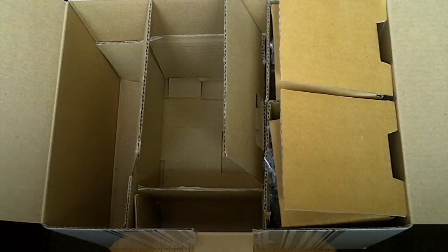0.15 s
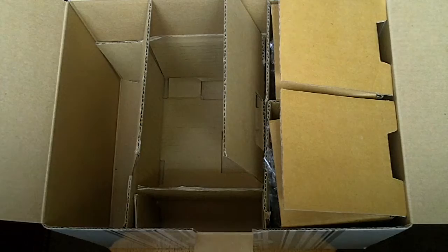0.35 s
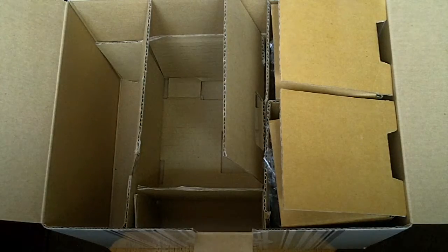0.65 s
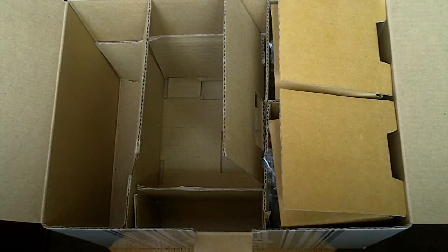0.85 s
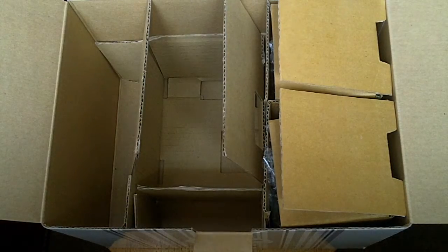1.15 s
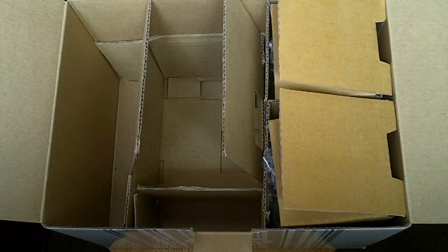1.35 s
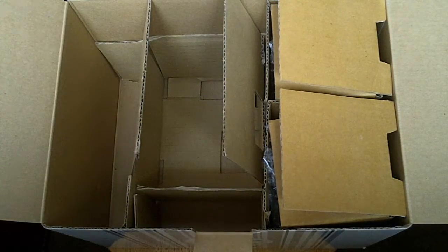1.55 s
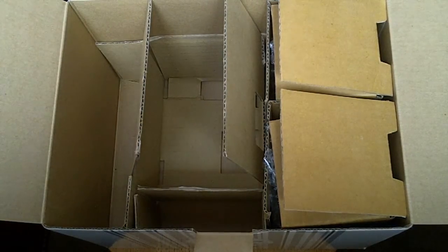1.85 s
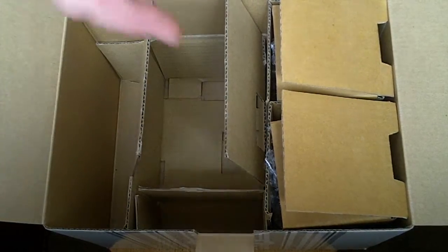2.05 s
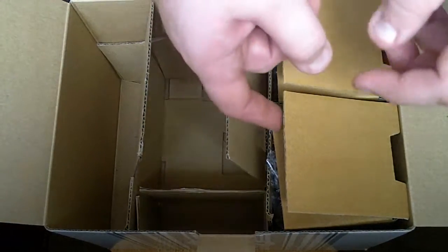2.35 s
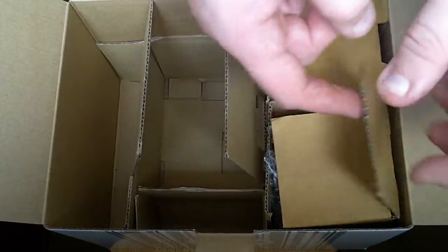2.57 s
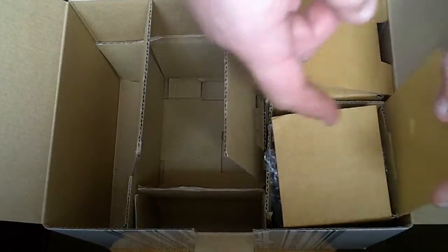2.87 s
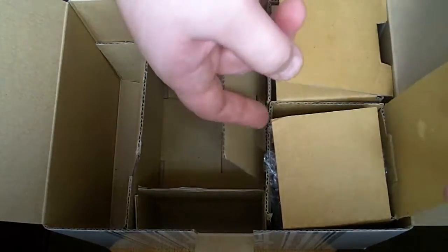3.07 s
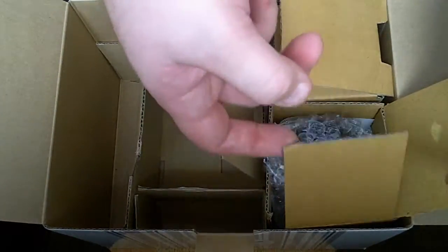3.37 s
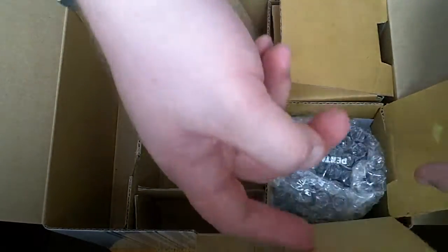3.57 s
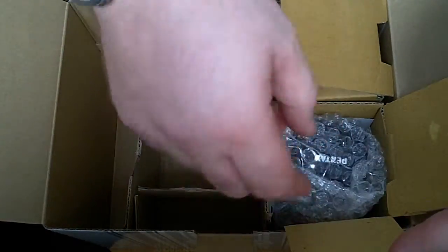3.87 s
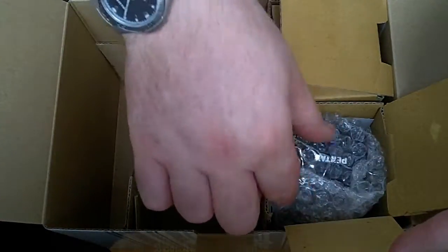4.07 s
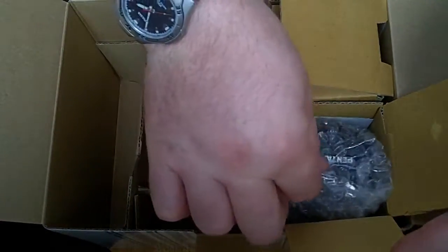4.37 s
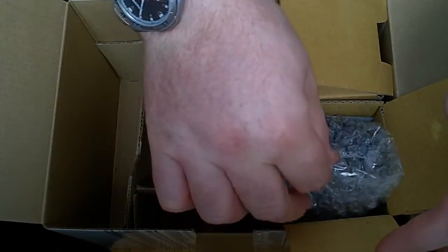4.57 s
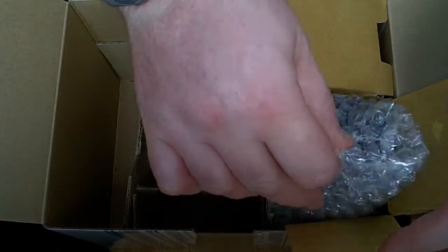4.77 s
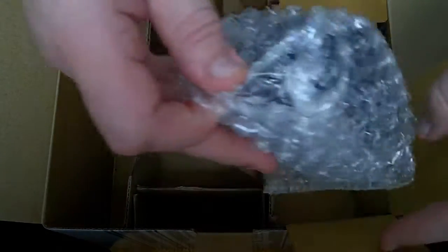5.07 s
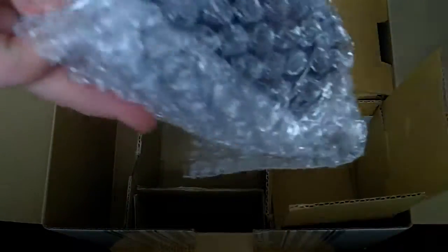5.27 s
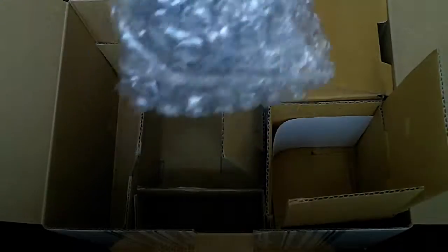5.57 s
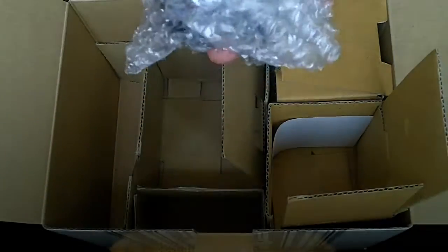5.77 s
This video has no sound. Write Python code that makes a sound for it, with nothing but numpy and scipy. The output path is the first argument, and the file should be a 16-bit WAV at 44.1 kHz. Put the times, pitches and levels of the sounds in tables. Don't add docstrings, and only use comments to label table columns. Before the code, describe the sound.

Bubble wrap crackles and snaps as a parcel is pulled from a hollow cardboard box, with bumps, a sharp flap slap and fan hum.

```python
import sys
import numpy as np
from scipy import signal
from scipy.fft import rfft, irfft, next_fast_len
from scipy.io import wavfile
from scipy.ndimage import map_coordinates

SR = 44100
rng = np.random.default_rng(int(sys.argv[2]) if len(sys.argv) > 2 else 0)


def to_linear_factor(level_db):
    exponent = np.asarray(level_db, float) / 20
    return 10 ** exponent


def waveform_to_disk(signal):
    frames = np.transpose(np.atleast_2d(signal))
    scaled = np.clip(frames, -1, 1) * 32767
    samples = np.round(scaled).astype(np.int16)
    wavfile.write(sys.argv[1], SR, samples)


N = 261072

# (frequency [Hz], level [dB per Hz])
FIZZ_SPECTRUM = [(2000, -84.5), (4000, -24.5), (5200, 5), (7300, 5.5), (10000, -2.5), (12000, -21),
                 (13500, -17.5), (15200, -16.5), (15600, -100)]


def unit(x):
    return x / np.sqrt(np.mean(x ** 2) + 1e-20)


def along(points, hz):
    f, v = np.transpose(points)
    return np.interp(np.log(hz + 1), np.log(f + 1), v)


def curves(rows):
    s, *cols = np.transpose(rows)
    return np.array([np.interp(np.arange(N) / SR, s, c) for c in cols])


def wobble(rate_hz):
    knots = rng.standard_normal(int(N * rate_hz / SR) + 4)
    return map_coordinates(knots, [np.arange(N) * rate_hz / SR])


def filtered(x, response):
    m = next_fast_len(len(x) + 8192)
    return irfft(rfft(x, m) * response(np.fft.rfftfreq(m, 1 / SR)), m)[:len(x)]


def causal(gain_db):
    cepstrum = irfft(np.log(to_linear_factor(gain_db(np.fft.rfftfreq(4096, 1 / SR))) + 1e-6))
    cepstrum = cepstrum * np.r_[1, 2 * np.ones(2047), 1, np.zeros(2047)]
    h = irfft(np.exp(rfft(cepstrum)))[:2048]
    return h / np.linalg.norm(h)


def coloured(x, spectrum):
    return signal.fftconvolve(x, causal(lambda hz: along(spectrum, hz)))[:N]


def ring(modes, t):
    return sum(to_linear_factor(db - 60 * t / t60) * np.sin(2 * np.pi * hz * t) for hz, db, t60 in modes)


def fan():
    # (frequency [Hz], level [dB per Hz])
    air_spectrum = [(15, -45), (25, -18), (70, -10.5), (177, 0.5), (382, -3.5), (520, -4), (827, -5),
                    (893, -20), (1040, -7.5), (1350, -9), (2500, -19.5), (2920, -22), (4750, -41),
                    (7750, -60), (11700, -39), (15200, -77), (22000, -120)]
    # (frequency [Hz], wander [Hz], level [dB rms])
    fan_lines = [(881, 6.55, -61.5), (1362, 8.57, -65.5), (2877, 0.92, -70)]
    noise = filtered(rng.standard_normal(N), lambda f: to_linear_factor(along(air_spectrum, f)) * (f < 11750))
    out = to_linear_factor(-52.0 + 0.65 * wobble(2.99)) * unit(noise)
    for hz, wander_hz, db in fan_lines:
        level = to_linear_factor(db) * to_linear_factor(2.5 + 1.55 * wobble(17))
        phase = 2 * np.pi * np.cumsum(hz + wander_hz * wobble(25)) / SR
        out = out + level * np.sin(phase)
    return out


def electronics():
    # (frequency [Hz], level [dB rms])
    leak_lines = [(5695, -88.5), (5755, -93), (11449, -94), (14355.6, -98), (14385.6, -95)]
    field_hz, half_line_hz, first_field_s = 59.94, 7867.1, .0146
    t = np.arange(N) / SR
    fields = (t - first_field_s) * field_hz
    flip = np.clip(12 * np.sin(np.pi * fields / 2), -1, 1)
    whine = to_linear_factor(-72) * flip * np.sin(2 * np.pi * half_line_hz * t)
    pulse = np.diff(np.floor(fields), prepend=-1)
    # (Hz, width Hz, gain)
    bands = [(5640, 240, 0.26), (6420, 300, 1), (7060, 270, 0.25), (9660, 340, 0.35), (10900, 250, 0.25)]
    tick = filtered(pulse, lambda f: sum(g * np.exp(-((f - hz) / w) ** 2) for hz, w, g in bands))
    lines = sum(to_linear_factor(db + 5.5) * np.sin(2 * np.pi * hz * t) for hz, db in leak_lines)
    return whine + to_linear_factor(-85.5) * unit(tick) + lines


def effort():
    # (time [s], film crumpling [dB], cardboard pressure [dB])
    slow_effort = [(0, -68, -53.5), (.45, -66.5, -64.5), (.74, -49.5, -55), (.83, -52.5, -48),
                   (.88, -56, -61), (1.04, -65, -66), (1.3, -71, -58.5), (2.1, -61, -58), (2.3, -58.5, -54),
                   (3.2, -61.5, -50), (3.6, -74.5, -59), (4.1, -81.5, -53), (4.37, -52.5, -45.5),
                   (5.01, -39.5, -50.5), (5.08, -60.5, -53), (5.65, -61.5, -48), (5.69, -51, -47.5),
                   (5.92, -49.5, -46)]
    # (peak time [s], rise [s], fall [s], film [dB], cardboard [dB])
    strokes = [(.206, 0.048, 0.016, -79, -53), (.97, 0.074, 0.11, -50.5, -63),
               (1.119, 0.13, 0.17, -44.5, -38), (1.448, 0.026, 0.04, -52.5, -50),
               (2.256, 0.12, 0.036, -86, -49), (2.87, 0.036, 0.13, -75, -45),
               (3.034, 0.026, 0.024, -56, -44.5), (3.114, 0.15, 0.024, -68.5, -47),
               (3.19, 0.022, .04, -56, -58), (3.34, 0.056, 0.076, -55, -51), (3.44, .04, 0.14, -55.5, -53),
               (3.77, 0.098, 0.12, -60, -65), (3.83, 0.27, 0.45, -73, -49), (4.11, 0.014, 0.084, -54, -56),
               (4.325, 0.16, 0.15, -39.5, -44.5), (4.71, 0.18, 0.075, -69, -41),
               (4.8, 0.1, 0.37, -41.5, -64), (4.939, 0.032, 0.2, -56, -40.5),
               (5.824, 0.2, 0.021, -36.5, -43), (5.901, 0.05, 0.023, -46, -40.5)]
    # (time [s], fall [s], film [dB], cardboard [dB])
    jolts = [
        (2.779, 0.074, -49, -36),
        (4.493, 0.08, -36, -32.5),
        (5.03, 0.016, -51, -23),
        (5.576, 0.014, -36.5, -53),
        (5.679, 0.065, -42, -57),
    ]
    jolt_rise_s = .001
    depth_db = 20
    t = np.arange(N) / SR
    power = to_linear_factor(2 * curves(slow_effort))
    for s, rise_s, fall_s, *db in strokes + [(s, jolt_rise_s, *rest) for s, *rest in jolts]:
        away = np.where(t < s, (s - t) / max(rise_s, 1e-3), (t - s) / max(fall_s, 1e-3))
        power = power + to_linear_factor(2 * np.array(db))[:, None] * to_linear_factor(-2 * depth_db * away)
    return 10 * np.log10(power)


def creases(per_s, spread_db, clump_db):
    hit = rng.random(N) < per_s / SR
    size = rng.standard_normal(N) * to_linear_factor(spread_db * np.minimum(rng.exponential(size=N), 3))
    return unit(hit * size * to_linear_factor(clump_db * wobble(45)))


def handling():
    # (frequency [Hz], level [dB per Hz])
    film_spectrum = [(500, -42), (1000, -5), (1700, -4.5), (2000, -1), (2900, -6.5), (4000, -9),
                     (4500, -18), (5800, -54), (9900, -120)]
    # (frequency [Hz], level [dB per Hz])
    scrape_spectrum = [(200, -92.5), (400, -37), (750, -5.5), (1000, -2), (1200, -4.5), (1480, -1),
                       (1800, -6.5), (2600, -47.5), (5000, -120)]
    # (frequency [Hz], level [dB per Hz])
    card_spectrum = [(53, -58.5), (90, -10), (230, -9.5), (270, -9), (344, -2), (580, -11), (662, -11),
                     (1000, -15.5), (1300, -42), (2200, -120)]
    # (time [s], level [dB])
    brushing = [(0, -80), (.6, -57), (.84, -46), (.95, -63), (1.3, -66.5), (2.1, -62), (2.35, -52.5),
                (2.75, -58.5), (2.95, -65), (3.6, -80.5), (4.0, -56), (4.3, -69), (5.1, -60), (5.5, -56.5),
                (5.92, -74)]
    film_db, card_db = effort()
    bright_db = -14.5 - 0.049 * (film_db + 56)
    warm_db = -3.5 + 0.45 * (card_db - film_db)
    ticks = creases(2200, spread_db=-0.5, clump_db=2.5) + .5 * rng.standard_normal(N)
    scrape = 0.38 * ticks + creases(2000, spread_db=0.5, clump_db=2.0)
    drag = creases(1500, spread_db=2.0, clump_db=3.5) + 0.97 * rng.standard_normal(N)
    film = unit(coloured(ticks, film_spectrum)) + to_linear_factor(bright_db) * unit(coloured(ticks, FIZZ_SPECTRUM))
    rub_level = np.hypot(to_linear_factor(film_db + warm_db), to_linear_factor(curves(brushing)[0]))
    rub = rub_level * unit(coloured(scrape, scrape_spectrum))
    card = to_linear_factor(card_db - 0.5) * unit(coloured(drag, card_spectrum))
    return to_linear_factor(film_db - 1.22) * film + rub + card


def snap_rows():
    # (time [s], peak [dB])
    aside = [
        (.6462, -28),
        (0.7036, -31),
        (0.7608, -28),
        (0.78, -25),
        (0.7973, -23.5),
        (.8436, -30.5),
        (0.971, -28),
    ]
    # (time [s], peak [dB], box knock [dB], fizz [dB])
    taps = [(2.2244, -30, -2, -29), (2.2524, -50, 19, -25), (2.6086, -36, -14, -31),
            (2.7768, -22, -22, -11.5), (2.7785, -24, -3, -27), (2.8687, -44, -3, -30.5),
            (3.001, -31, -14, -13.5), (3.027, -31, -2, -32), (3.0624, -28, 2, -34.5),
            (3.098, -43.5, 10, -26), (3.1212, -34.5, -15, -29), (3.1885, -31.5, -5, -13),
            (3.2168, -41, 12, -8), (3.281, -17.5, 4.5, -48), (3.315, -14.5, -9, -31),
            (3.4143, -28, -18, -28), (3.436, -29, -4, -31), (3.459, -26.5, -1, -31),
            (3.7726, -36, -14, -23.5), (3.8187, -45, 13, -21)]
    # (time [s], peak [dB], box knock [dB], fizz [dB])
    pull = [(4.1086, -36, -9, -26), (4.172, -25, -25, -26), (4.1785, -38, -34, -9),
            (4.1964, -32.5, -10, -8.5), (4.2475, -22, -25, -18), (4.256, -30, -20, -15),
            (4.2644, -22, -14, -16), (4.2944, -44, -15, -25), (4.31, -38, -15, -24), (4.328, -15, -9, -23),
            (4.3504, -22, -20, -29), (4.4352, -26, 5, -28), (4.4539, -23.5, -1, -25),
            (4.4918, -13, -2.5, -40), (4.5205, -27.5, 7, -14), (4.584, -27.5, -11, -20),
            (4.6994, -37, 2, -7), (4.791, -27, -25, -30), (4.8764, -24, -5, -17), (4.9421, -23, -16, -29),
            (4.9657, -17, -11, -18), (5.021, -12, -21, -48), (5.029, -7, -21, -19.5),
            (5.0305, -20, -0.5, -33), (5.0788, -24, -13, -21)]
    # (time [s], peak [dB], box knock [dB], fizz [dB])
    turn = [(5.115, -46, -17, -35), (5.163, -41, -15, -25), (5.2033, -28, -0.5, -22),
            (5.2474, -31, -1, -18), (5.3501, -29, -10, -36), (5.3675, -28, -1.5, -21),
            (5.418, -35.5, -18, -25), (5.466, -37, -12, -18), (5.4942, -28.5, -4, -12.5),
            (5.522, -33, -15, -13), (5.54, -33, -15, -19), (5.5592, -26.5, -18, -24),
            (5.576, -20.5, -20, -21), (5.6685, -28, -9, -15), (5.6765, -26, 14.5, -23.5),
            (5.68, -29, -7, -1.5), (5.714, -31, -24, -5), (5.7507, -20.5, -6, -16), (5.7687, -25, 5.5, -13),
            (5.782, -26, -6, -18), (5.7961, -24, -7, -14), (5.8207, -21, -19, -30), (5.8966, -38, -14, -10)]
    # (time [s], peak [dB], box knock [dB], fizz [dB])
    crackles = [(4.2338, -32, -20, -27), (4.3864, -30, -20, -29), (4.4757, -27, -20, -22),
                (4.5534, -35, -20, -22), (4.5745, -32, -20, -22), (4.6608, -41, -20, -22),
                (4.7074, -33, -20, -22), (4.7444, -31, -20, -22), (4.8014, -33, -20, -22),
                (4.8264, -31, -22, -22), (4.8394, -35.5, -20, -22), (4.9024, -33, -18, -22),
                (4.9364, -26, -20, -20), (4.9911, -30, -20, -22), (5.0594, -37, -20, -20)]
    aside_knock_db, aside_fizz_db = -13, -21
    aside = [(s, db, aside_knock_db, aside_fizz_db) for s, db in aside]
    # (t60 s, usual cell Hz)
    groups = [(aside, (0.076, 1200)), (taps, (0.031, 1760)), (pull, (0.034, 1430)),
              (turn, (0.054, 2800)), (crackles, (0.031, 2300))]
    rows = np.array([(*row, *ringing) for table, ringing in groups for row in table])
    t60_spread, cell_spread = .25, .15
    scatter = np.exp(rng.standard_normal((len(rows), 2)) * [t60_spread, cell_spread])
    return np.c_[rows[:, :4], rows[:, 4:] * scatter]


def knocked(x):
    # (frequency [Hz], width [Hz], level [dB])
    wall_modes = [(144, 28, -3.5), (232, 38, -4.5), (337, 67, 6), (464, 540, -0.5), (787, 137, 1)]

    def response(f):
        walls = 0
        for k, (hz, w, db) in enumerate(wall_modes):
            walls = walls + (-1) ** k * to_linear_factor(db) * 1j * f * w / (hz * hz - f * f + 1j * f * w)
        return walls / (1 + 1j * f / 1500) ** 2
    return filtered(x, response)


def snaps():
    # (frequency [Hz], level [dB per Hz])
    snap_spectrum = [(410, -29), (700, -3), (971, 5.5), (1410, -9.5), (1520, 2.5), (1990, 2), (3970, -8),
                     (4500, -13.5), (5850, -71.5), (9900, -120)]
    t = np.arange(SR // 8) / SR
    crack, fizz, knock = np.zeros((3, N + SR))
    for s, db, knock_db, fizz_db, t60, hz in snap_rows():
        decay = to_linear_factor(-60 * t / 0.0035) + 0.38 * to_linear_factor(-60 * t / max(t60, .005))
        burst = rng.standard_normal((2, len(t))) * decay
        burst[:, 0] = 2.8
        cell = signal.lfilter(*signal.iirpeak(hz, 2.5, SR), burst[0])
        at = slice(round(s * SR), round(s * SR) + len(t))
        crack[at] += to_linear_factor(db - 8.5) * (0.51 * burst[0] + 0.52 * cell)
        fizz[at] += to_linear_factor(db + fizz_db - 7.5) * burst[0]
        knock[at] += to_linear_factor(db + knock_db + 8.5) * burst[1]
    return coloured(crack, snap_spectrum) + coloured(fizz, FIZZ_SPECTRUM) + knocked(knock[:N])


def pings():
    # (time [s], level [dB], frequency [Hz], t60 [s])
    plucks = [
        (0.8455, -35, 1485, 0.039),
        (1.444, -32.5, 1480, 0.025),
        (2.35, -41, 1380, 0.045),
    ]
    t = np.arange(SR // 5) / SR
    out = np.zeros(N + SR)
    for s, db, hz, t60 in plucks:
        modes = [(hz, db, t60), (0.54 * hz, db - 20, t60)]
        out[round(s * SR):][:len(t)] += ring(modes, t) * (1 - np.exp(-t / 0.0011))
    return out[:N]


def box():
    # (time [s], peak [dB], contact [s])
    bumps = [
        (1.1066, -13.5, 0.0038),
        (1.121, -18, 0.0046),
        (1.1405, -11.5, 0.00059),
        (1.145, -20, 0.00073),
        (1.1502, -15.5, 0.0017),
        (1.1595, -17.5, 0.0021),
    ]
    # (frequency [Hz], level [dB], t60 [s])
    hollow_modes = [(140, -11, 0.055), (210, -0.5, 0.064), (274, 7, 0.038), (446, 6, 0.047),
                    (1164, -3.5, 0.054)]
    # (time [s], level [dB])
    slaps = [
        (3.2443, -2.5),
        (3.2454, 0),
        (3.2479, -5),
        (3.2504, -14),
        (3.28, -23),
        (3.291, -30),
    ]
    # (frequency [Hz], level [dB], t60 [s])
    flap_modes = [(133, -19, 0.17), (239.5, -6, 0.18), (347, 3, 0.0475), (704, -1.5, 0.035),
                  (806, 3.5, 0.018), (892, 4, 0.026), (1008, 4.5, 0.053), (1078, -23, 0.09),
                  (1420, -4.5, 0.027), (1920, 3, 0.022), (2060, -11, 0.087), (2300, 5, 0.015),
                  (3100, -30, 0.036), (4150, -2.5, 0.0074)]
    # (frequency [Hz], level [dB per Hz])
    crack_spectrum = [(30, -12.5), (100, -48), (600, -26), (1000, 2.5), (1400, -8.5), (1900, -7),
                      (4200, -17.5), (5500, -28.5), (9000, -38), (13000, -49.5), (16000, -68)]
    # (time [s], level [dB], frequency [Hz], t60 [s])
    belly = (1.35, -27.5, 139, 0.26)
    # (time [s], level [dB])
    flicks = [
        (2.7764, -41),
        (2.7787, -26.5),
        (2.784, -37.5),
        (2.869, -38.5),
        (3.0278, -33),
        (5.678, -35.5),
    ]
    # (frequency [Hz], level [dB], t60 [s])
    edge_modes = [(325, -15, 0.076), (493, 1.5, 0.024), (1152, -1.5, 0.035), (1693, -10, 0.045),
                  (2350, -9.5, .02)]
    t = np.arange(SR // 2) / SR
    out, cracks = np.zeros((2, N + SR))
    for s, db, contact_s in bumps:
        push = np.hanning(round(contact_s * SR) + 3)
        bump = np.convolve(ring(hollow_modes, t), push / push.sum())[:len(t)]
        out[round(s * SR):][:len(t)] += to_linear_factor(db - 10.5) * bump
    for s, db in slaps:
        out[round(s * SR):][:len(t)] += to_linear_factor(db - 12.5) * ring(flap_modes, t) * (1 - np.exp(-t / 0.00088))
        rattle = to_linear_factor(-60 * t / 0.012) + 0.11 * to_linear_factor(-60 * t / 0.1)
        cracks[round(s * SR):][:len(t)] += to_linear_factor(db - 5.5) * rattle * rng.standard_normal(len(t))
    s, db, hz, t60 = belly
    out[round(s * SR):][:len(t)] += ring([(hz, db, t60)], t) * (1 - np.exp(-t / 0.0076))
    for s, db in flicks:
        out[round(s * SR):][:len(t)] += to_linear_factor(db) * ring(edge_modes, t)
    return out[:N] + coloured(cracks, crack_spectrum)


def puffs():
    # (time [s], level [dB], length [s])
    pushes = [
        (3.2445, -29, .006),
        (1.225, -47, 0.0099),
    ]
    start_s, db, length_s = np.array(pushes).T
    u = (np.arange(N) / SR - start_s[:, None]) / length_s[:, None]
    u = np.clip(u, 0, 30)
    return to_linear_factor(db) @ (np.sin(np.pi * u) * u * np.exp(-u))


def room(x):
    # (frequency [Hz], t60 [s])
    room_t60 = [(150, 0.17), (1000, 0.23), (4000, 0.16), (12000, 0.12)]
    hz, t, z = signal.stft(rng.standard_normal(SR // 2), SR, nperseg=256)
    tail = signal.istft(z * to_linear_factor(-60 * t / along(room_t60, hz)[:, None]), SR, nperseg=256)[1]
    return signal.fftconvolve(np.pad(x, (200, 0)), tail / np.linalg.norm(tail))[:N]


def scene():
    near = handling() + snaps() + pings() + box()
    near = signal.sosfilt(signal.butter(4, 105, "high", fs=SR, output="sos"), near)
    return (near + to_linear_factor(-12) * room(near) + fan() + puffs())[None]


def thinned(x):
    sparse_hz, sparse_db = 11800, -109.5
    hz, _, z = signal.stft(x, SR, nperseg=1024)
    power = np.abs(z[:512].reshape(128, 4, -1)) ** 2
    patch = np.repeat(np.mean(power, axis=1), 4, axis=0)
    keep = (patch > to_linear_factor(2 * sparse_db)) | (hz[:512, None] < sparse_hz)
    z = z * np.r_[keep, np.zeros((1, z.shape[1]))]
    return signal.istft(z, SR, nperseg=1024)[1][:N]


def top_cut(x):
    return signal.sosfilt(signal.butter(12, 15810, fs=SR, output="sos"), x)


def record(dry):
    # (frequency [Hz], width [Hz], depth [dB])
    notches = [(4790, 230, -13), (5800, 470, -24), (8490, 420, -28.5), (11900, 220, -22)]
    housing = causal(lambda f: sum(db / (1 + (2 * (f - hz) / w) ** 2) for hz, w, db in notches))
    x = to_linear_factor(-0.65) * signal.fftconvolve(dry[0], housing)[:N] + electronics()
    x = x / (1 + np.abs(x) ** 8) ** (1 / 8)
    return top_cut(thinned(x)[None])


dry = scene()
out = record(dry)
waveform_to_disk(out)
```